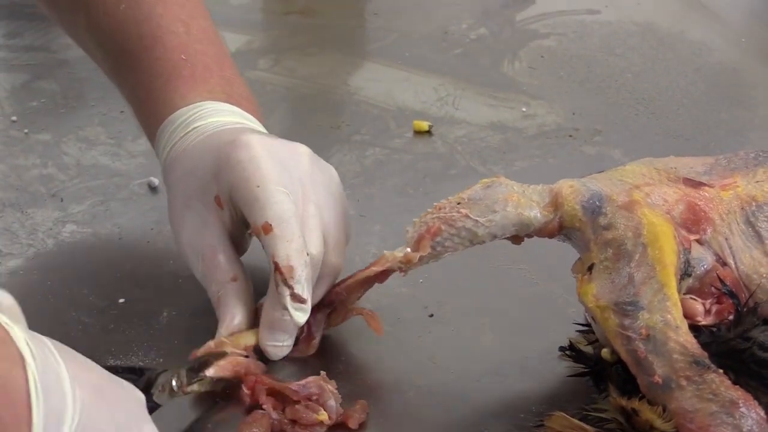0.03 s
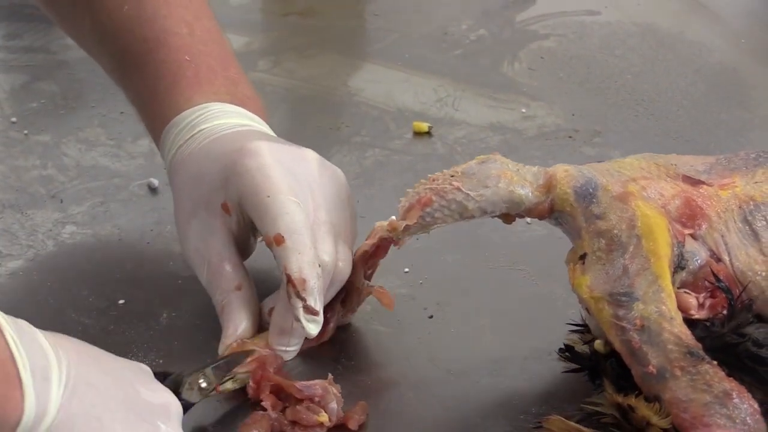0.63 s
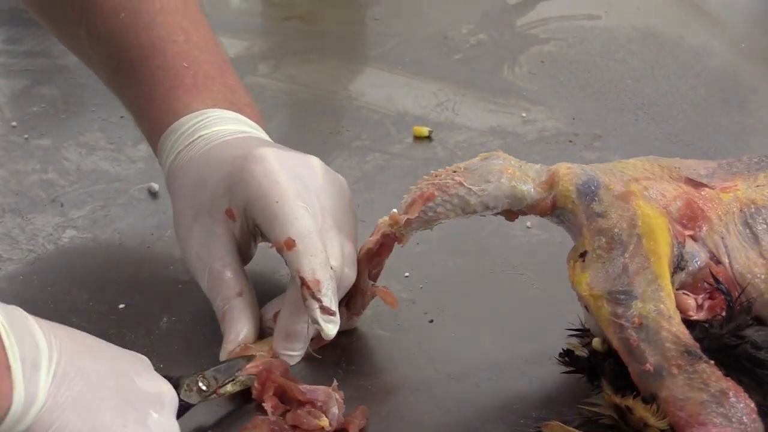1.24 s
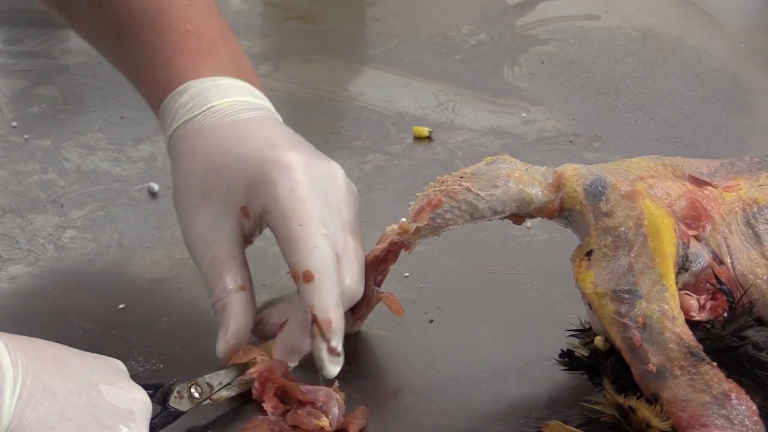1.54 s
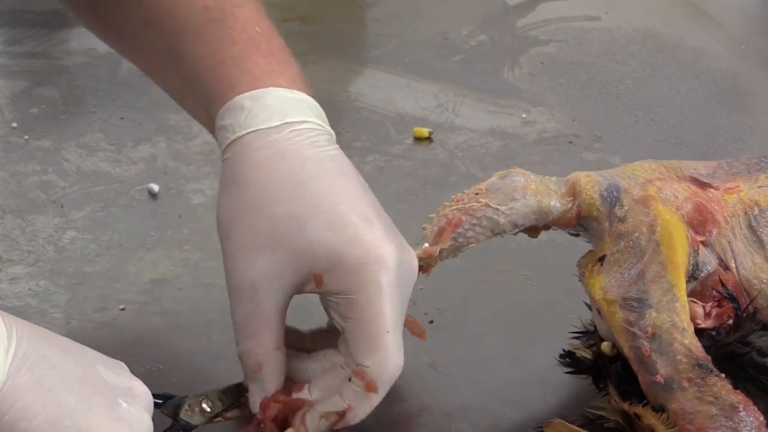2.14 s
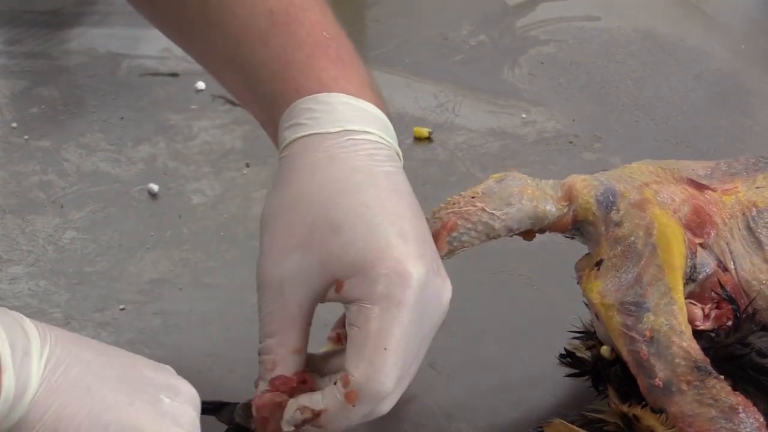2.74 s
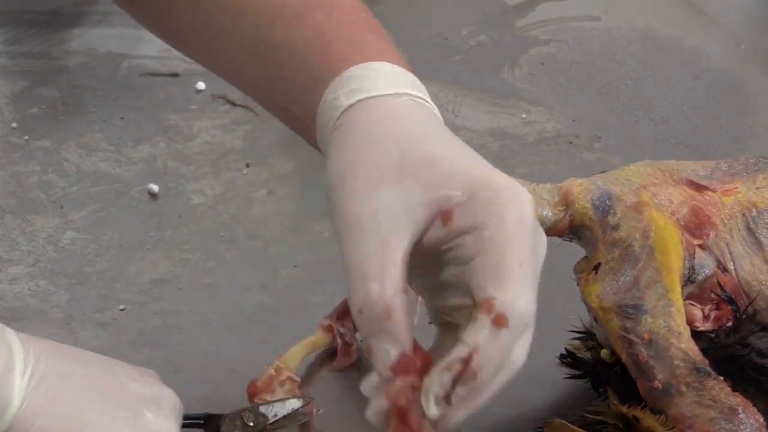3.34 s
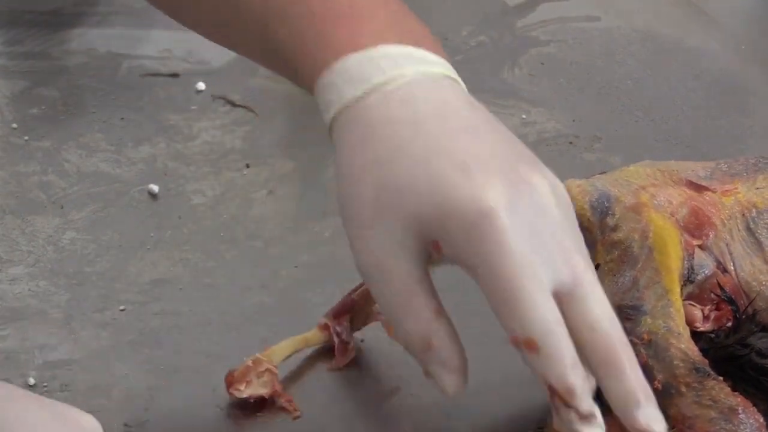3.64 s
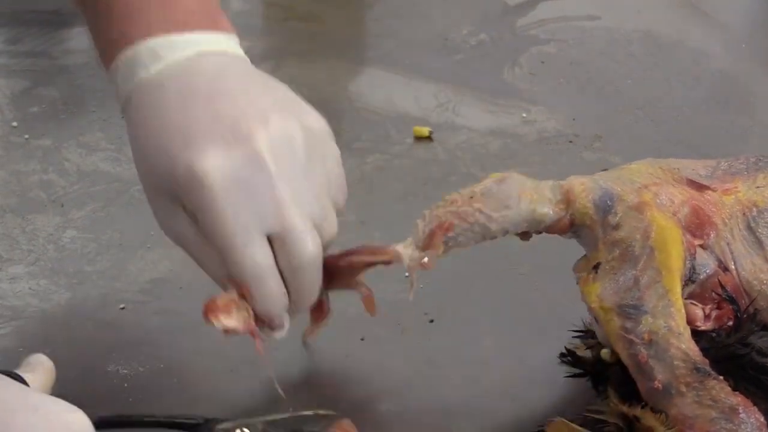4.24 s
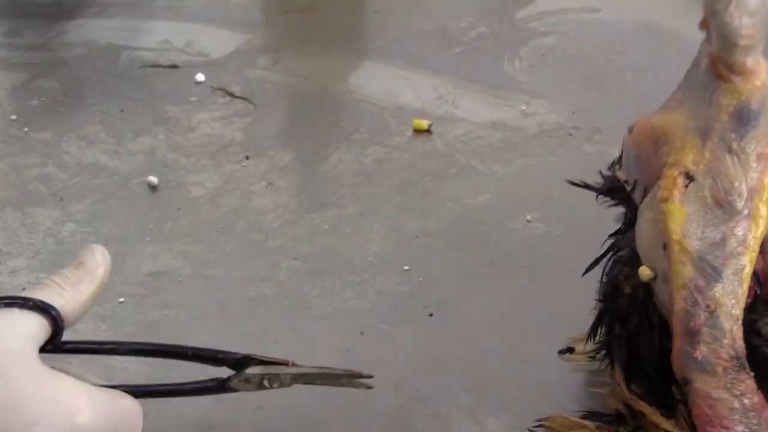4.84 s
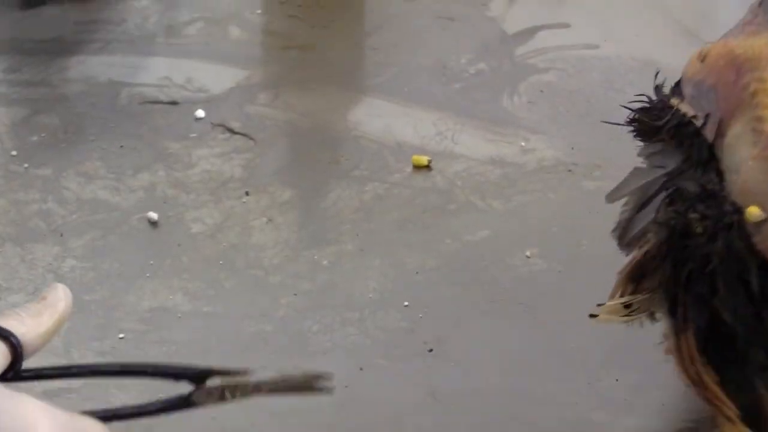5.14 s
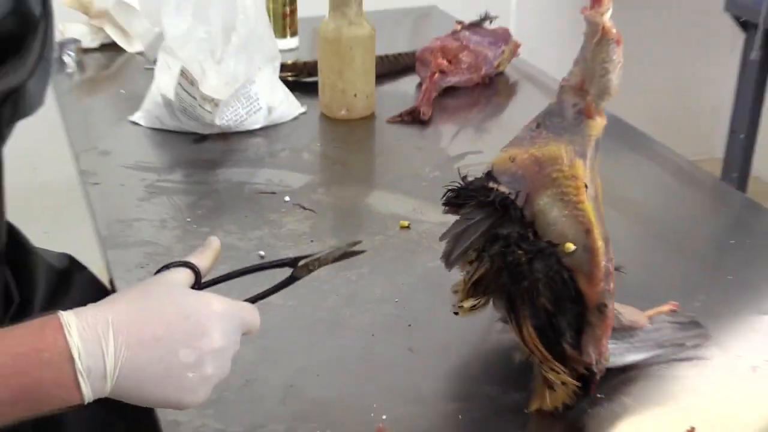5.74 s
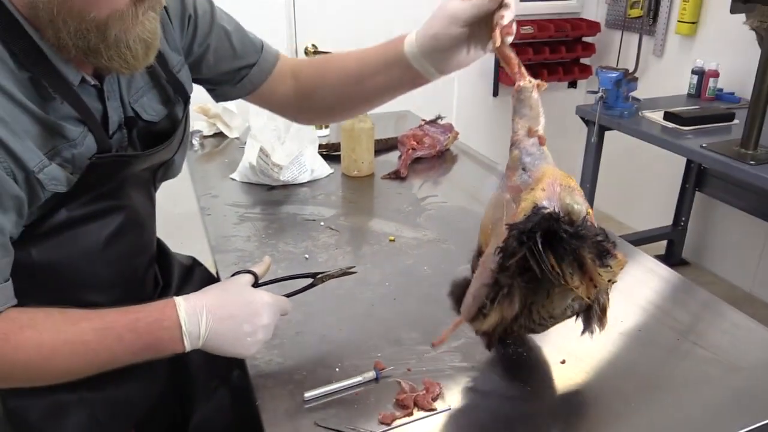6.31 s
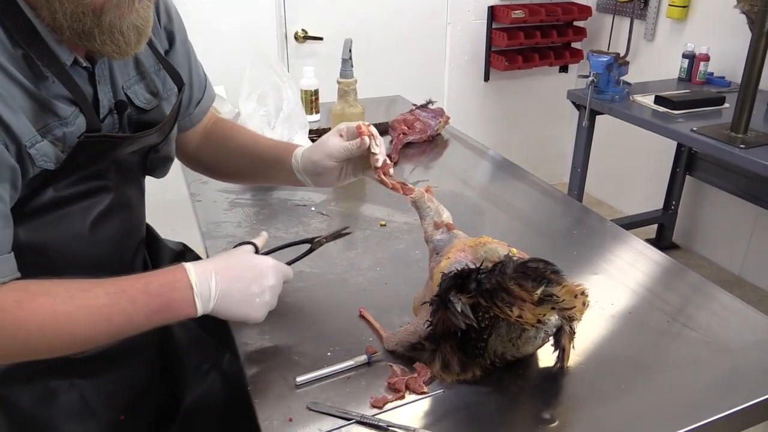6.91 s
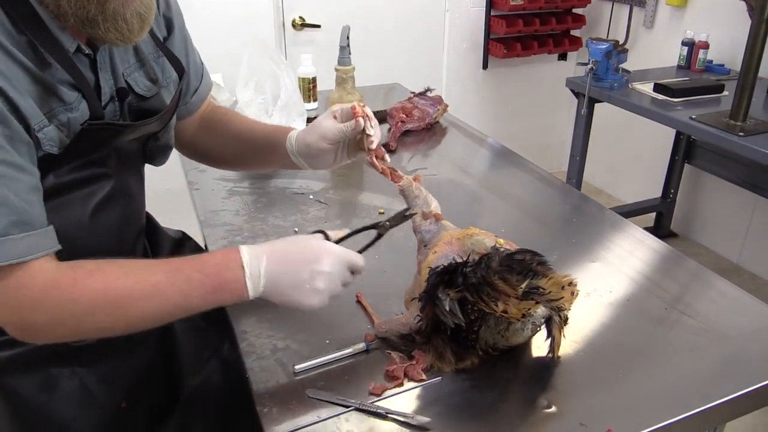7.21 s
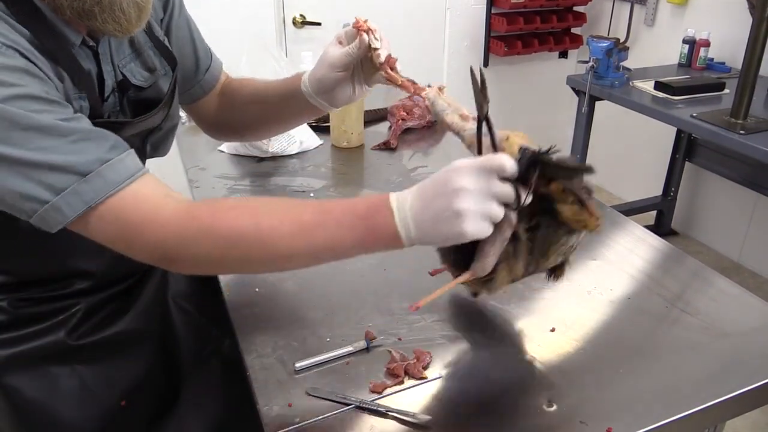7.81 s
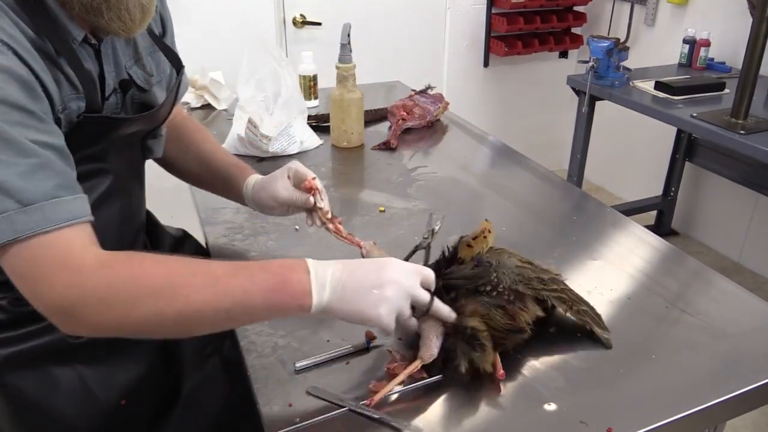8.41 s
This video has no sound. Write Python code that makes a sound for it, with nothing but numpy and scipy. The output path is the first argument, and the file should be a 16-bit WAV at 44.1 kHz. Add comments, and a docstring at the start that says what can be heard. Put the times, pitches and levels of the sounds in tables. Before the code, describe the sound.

Light taps on a steel tabletop mix with close, irregular scissor snips through a bird's wing. The blades rub faintly, tick and snap shut, making the table ring. After the sharpest snip comes a quieter stretch, then the carcass lands with a loud, hollow metallic knock. Feathers and gloves rustle, and two more knocks follow near the end. A faint rumble and hiss fills the slightly echoing workroom.

```python
"""A hard-walled workroom with a steel table. Scissors snip meat and tendon from a bird's wing.
Each cut ends in a click of the blades and a boom of the table top; between cuts the blades rub
and the hands nudge the table. Then the carcass is lifted, its feathers rustle, and it is knocked
down on the steel a few times. The room rumbles and hisses faintly throughout."""
import sys
import numpy as np
from scipy import signal
from scipy.fft import rfft, irfft, next_fast_len
from scipy.io import wavfile

SR = 44100
rng = np.random.default_rng(int(sys.argv[2]) if len(sys.argv) > 2 else 0)


def output_pcm(signal):
    """Save a mono or channel-first signal as 16-bit PCM at the path in sys.argv[1].

    Samples are clipped to [-1, 1] before scaling.
    """
    pcm = np.clip(np.atleast_2d(signal).T, -1, 1) * 32767
    wavfile.write(sys.argv[1], SR, np.round(pcm).astype(np.int16))


N = 373086
AGE_S = np.arange(SR) / SR   # time since a blow
BINS_HZ = np.arange(SR // 2 + 1) + 1e-3   # spectrum bins of that second

# Spectra of room air, rustle, carcass contact and blade contact.
# Each row: frequency in Hz, relative level in dB.
AIR_SPECTRUM = [(12, -20), (20, 3), (59, -3), (113, -6.5), (233, -17), (345, -16.5), (510, -23), (693, -17),
                (1050, -29), (1950, -32), (3400, -33.5), (5170, -32.5), (6120, -33.5), (14500, -34.5),
                (15800, -34.5)]
RUSTLE_SPECTRUM = [(88, 2), (150, -5.5), (312, -7), (380, -3.5), (649, -6), (1130, -11.5), (1500, -19),
                   (2800, -20.5), (4500, -26), (15000, -32)]
CARCASS_SPECTRUM = [(60, -19), (130, -3), (230, -1.5), (340, -1.5), (560, -0.5), (800, -8.5), (980, -10.5),
                    (1500, -22), (2400, -23), (3500, -25.5), (4500, -32), (7500, -38), (10000, -34),
                    (15500, -46)]
BLADE_SPECTRUM = [(60, -14), (160, -28.5), (250, -5.5), (370, -5.5), (480, -0.5), (720, -4), (1020, -22),
                  (1300, -18.5), (1950, -19), (2400, -23), (3500, -27.5), (4250, -25.5), (10500, -38),
                  (15500, -43)]

# Six ring-out bands: five crossovers and six centres, in Hz.
CROSSOVERS_HZ = [330, 850, 2000, 4200, 8500]
CENTRES_HZ = [200, 530, 1300, 2900, 6000, 11000]
# Decay of sheet and room by band. Each row: t60 in seconds, first-ring weight, build-up in seconds.
BAND_DECAYS = [(0.57, 1.3, 0.00057), (0.68, 3.1, 0.0042), (0.75, 0.24, 0.00036), (0.71, 0.032, 0.0071),
               (0.72, 0.067, 0.027), (0.51, 0.26, 0.0059)]
# Ring-out of each kind of contact. Each entry: relative band level in dB.
NUDGE_BANDS_DB = [-17, -20.5, -32, -49, -51, -53]
KNOCK_BANDS_DB = [-11.5, -1, -6, -16, -20.5, -23]
SNIP_BANDS_DB = [-13.5, 0.5, -9, -14.5, -22.5, -16.5]

# Table top modes. Each row: frequency in Hz, relative level in dB, t60 in seconds.
SHEET_MODES = [(127.7, -4, 0.62), (185.6, -6.5, 0.71), (219.6, -1, 0.32), (257.4, -9, 0.62),
               (277, -2, 0.36), (327, -42, 0.26), (457, -9.5, 0.94), (490.3, -6.5, 0.57), (510, -29, 0.54),
               (587, -39, 0.25), (616, -21, 0.38), (640, -11, 0.55), (943, -11.5, 0.79), (1094, -27, 0.38)]
# Broad scissor resonances. Each row: centre in Hz, width in Hz, boost in dB.
BLADE_RESONANCES = [(3360, 880, 7.5), (5120, 1100, 11.5), (6950, 1400, 11.5), (8050, 1000, 2),
                    (9770, 2500, 8.5), (13700, 1200, 5)]
# Clear blade tones. Each row: frequency in Hz, relative level in dB.
BLADE_PARTIALS = [(2007, -8), (2563, -5), (3327, -5), (3618, -3), (5146, -6), (6621, -6), (7219, -4),
                  (7795, -3), (8210, 9), (9369, 6), (9399, -4), (9655, -18), (9911, -11), (10080, -5)]

# Feathers and gloves brush past. Each row: centre in seconds, width in seconds, level in dB.
BRUSHES = [(0.1, 0.62, -74.5), (2.25, 0.31, -70), (3.52, 0.55, -72), (5.04, 0.34, -69), (5.553, 0.23, -68),
           (6.4, 2.2, -68.5), (7.47, 0.19, -66), (7.737, 0.28, -58), (8.407, 0.4, -56.5)]
# Dull thuds as things are moved. Each row: start in seconds, level in dB, pitch in Hz.
PUSHES = [(2.897, -46, 95), (7.574, -47.5, 61), (7.62, -54, 105), (7.828, -46, 164)]
# Hands and scissors nudge the table. Each row: start in seconds, level in dB, boom in Hz,
# bass share in dB, settling time in seconds.
TOUCHES = [(0.109, -55.5, 420, -2.5, 0.014), (0.163, -45.5, 393, -8.5, 0.0081),
           (0.294, -53, 587, -20, 0.0045), (0.368, -42, 595, -12, 0.008), (0.501, -42.5, 516, -13.5, 0.024),
           (0.611, -49.5, 681, -15, 0.0045), (0.67, -49.5, 380, -6.5, 0.026),
           (0.827, -52, 560, -3.5, 0.0037), (1.105, -54, 580, -10, 0.008), (1.22, -50, 595, -19, 0.005),
           (1.256, -36, 587, -13.5, 0.17), (1.349, -30, 420, -27, 0.0059), (2.536, -49, 480, -5.5, 0.016),
           (2.599, -47, 496, -20, 0.0066), (2.882, -35, 530, -15, 0.031), (4.045, -46.5, 446, -4, 0.0051),
           (4.672, -52.5, 494, -10, 0.024)]
# Blades slide on each other and through gristle. Each row: start in seconds, length in seconds,
# level in dB, squeak in Hz, relative level of its octave in dB.
BLADE_RUBS = [(0.489, 0.02, -67.5, 6600, -15), (1.21, 0.015, -75, 5800, -15), (2.136, 0.28, -81, 5150, -12),
              (2.577, 0.046, -75, 6130, 2), (2.853, 0.044, -64, 5900, -2), (2.884, 0.029, -64, 1910, -15),
              (4.554, 0.088, -79, 5800, -9)]
# Pivot ticks. Each row: start in seconds, level in dB, resonance in Hz.
PIVOT_TICKS = [(0.352, -57, 4600), (1.8462, -55.5, 9850), (2.1306, -48.5, 6540), (2.2957, -58, 13300),
               (2.6135, -53, 12200), (2.9004, -46.5, 11700), (3.1373, -55, 12200), (4.657, -48, 13200)]
# Carcass and bone land. Each row: start in seconds, boom in dB, boom in Hz, top of the clack in Hz,
# click in dB, ring-out in dB, treble tilt in dB per octave, clack boost in dB.
LANDINGS = [(5.3431, -48, 507, 4020, -63.5, -62.5, 1, 9.5), (6.313, -36, 480, 3900, -58, -52, -3.5, 9.5),
            (6.4467, -18, 582, 3860, -48.5, -36, 0, -2.5), (8.0821, -26, 602, 2800, -56, -39, -1.5, -4),
            (8.236, -22.5, 567, 3860, -49, -41.5, -0.3, 7.5)]
# Blades snap through. Each row: start in seconds, boom in dB, boom in Hz, blade ring in Hz,
# shank ring in Hz, click in dB, ring-out in dB, treble tilt in dB per octave.
CUTS = [(0.5306, -45, 590, 6600, 1320, -59.5, -57.5, -4.5), (1.336, -30, 569, 6950, 1220, -43.5, -46, -1.7),
        (3.1778, -30, 465, 12200, 3230, -47, -46, 2.5), (4.0966, -17.5, 496, 9730, 2060, -45.5, -37.5, 1.0)]


def from_db(db):
    """Decibels to gain."""
    return 10 ** (np.asarray(db) / 20)


def rms_one(x):
    """Scale to rms 1."""
    return x / np.sqrt(np.mean(x ** 2) + 1e-30)


def gain_at(spectrum, hz):
    """Gain of a (Hz, dB) spectrum."""
    knots_hz, db = np.transpose(spectrum)
    return from_db(np.interp(np.log(hz + 1e-3), np.log(knots_hz), db))


def hump(centre_hz, width_hz):
    """One resonance over BINS_HZ, peak 1."""
    return 1 / (1 + (2 * (BINS_HZ - centre_hz) / width_hz) ** 2)


def fade(t60_s):
    """Exponential decay."""
    return np.exp(-np.log(1000) * AGE_S / t60_s)


def sine(hz):
    """One second of sine."""
    return np.sin(2 * np.pi * hz * AGE_S)


def noise(colour):
    """One second of noise with the given bin gains, rms 1."""
    return rms_one(irfft(colour * np.exp(2j * np.pi * rng.random(len(colour))), SR))


def coloured(track, spectrum):
    """Filter a whole track by a spectrum; rms 1."""
    size = next_fast_len(N)
    hz = np.arange(size // 2 + 1) * SR / size
    return rms_one(irfft(rfft(track, size) * gain_at(spectrum, hz), size)[:N])


def add(track, start_s, sound):
    """Mix a sound into a track."""
    at = max(round(start_s * SR), 0)
    track[at:at + len(sound)] += sound[:N - at]


def in_room(x, wet_db, t60_s=0.43):
    """Add the workroom's reverberation."""
    tail = rms_one(rng.standard_normal(SR) * fade(t60_s)) / np.sqrt(SR)
    return x + from_db(wet_db) * signal.fftconvolve(x, tail)[:N]


def room_air(level_db=-66):
    """Steady rumble and hiss."""
    return from_db(level_db) * coloured(rng.standard_normal(N), AIR_SPECTRUM)


def rustle(grains_per_s=6000, floor_db=-85, trim_db=-4):
    """Tiny slips of feathers and gloves swell with each move; the hands are never quite still."""
    time_s = np.arange(N) / SR
    swells = [from_db(db) * np.exp(-2 * ((time_s - centre_s) / width_s) ** 2)
              for centre_s, width_s, db in BRUSHES]
    motion = np.sqrt(from_db(floor_db) ** 2 + sum(swell ** 2 for swell in swells))
    grains = (rng.random(N) < grains_per_s / SR) * rng.standard_normal(N)
    return in_room(coloured(grains, RUSTLE_SPECTRUM) * motion * from_db(trim_db), wet_db=2.5)


def thuds(rise_cycles=0.33):
    """Slow, soft pushes: a few cycles of bass."""
    out = np.zeros(N)
    for start_s, db, hz in PUSHES:
        rise = AGE_S * hz / rise_cycles
        add(out, start_s, from_db(db) * sine(hz) * rise * np.exp(1 - rise))
    return out


def boom(hz, bass_gain, rise_s=0.002, bass_hz=285):
    """The sheet is pushed down and swings a few cycles before the wave spreads away."""
    swing = (AGE_S / rise_s * np.exp(1 - AGE_S / rise_s)) ** 1.27
    return -swing * (sine(hz) + bass_gain * sine(bass_hz)) / (1 + bass_gain / 2)


def ring_out(bands_db, colour, first_t60_s=0.098):
    """Dense modes of sheet and room in six overlapping bands: a short first ring, then the tail."""
    lowpasses = [0] + [1 / (1 + (BINS_HZ / hz) ** 10) for hz in CROSSOVERS_HZ] + [1]
    masks = np.sqrt(np.abs([high - low for low, high in zip(lowpasses, lowpasses[1:])]))
    early = slice(SR // 200, SR // 12)
    bands = []
    for mask, (t60_s, first_weight, build_s) in zip(masks, BAND_DECAYS):
        decay = fade(t60_s) + first_weight * fade(first_t60_s)
        band = noise(colour * mask) * decay * (1 - np.exp(-AGE_S / build_s))
        bands.append(band / np.std(band[early]))
    return from_db(bands_db) @ np.array(bands)


def nudges(boom_db=-8.5, bass_lift_db=8, damping_t60_s=4.9, repeats=3, gap_s=0.015, jitter_s=0.00183):
    """Soft touches boom the sheet and settle in a run of weaker ones; the hand shortens the ring."""
    out = np.zeros(N)
    for start_s, db, hz, bass_db, settle_s in TOUCHES:
        bands_db = np.array(NUDGE_BANDS_DB, float)
        bands_db[0] += bass_db + bass_lift_db
        colour = gain_at(CARCASS_SPECTRUM, BINS_HZ) * (1 + hump(hz, 300))
        thump = from_db(boom_db) * boom(hz, from_db(bass_db))
        delays_s = gap_s * np.arange(1, repeats + 1) + jitter_s * rng.standard_normal(repeats)
        for delay_s in [0, *delays_s]:
            force = from_db(db) * np.exp(-delay_s / settle_s)
            tail = ring_out(bands_db, colour) * fade(damping_t60_s)
            add(out, start_s + delay_s, force * (thump + tail))
    return out


def blade_gain():
    """Broad resonances of the steel blades."""
    return from_db(sum(db * hump(hz, width_hz) for hz, width_hz, db in BLADE_RESONANCES))


def rubs_and_ticks(slips_per_s=450, squeak_width_hz=520, tick_trim_db=-8, tick_t60_s=0.012):
    """Fine stick-slip of the sliding blades and ticks of the pivot."""
    out = np.zeros(N)
    steel = blade_gain() * (1 - hump(0, 6000))
    for start_s, length_s, db, hz, octave_db in BLADE_RUBS:
        slips = (rng.random(SR) < slips_per_s / SR) * rng.standard_normal(SR)
        squeak = hump(hz, squeak_width_hz) + from_db(octave_db) * hump(2 * hz, squeak_width_hz)
        grit = rms_one(irfft(rfft(slips) * (0.15 * steel + squeak), SR))
        stroke = np.sqrt(np.abs(np.sin(np.pi * np.minimum(AGE_S / length_s, 1))))
        add(out, start_s, from_db(db) * grit * stroke)
    for start_s, db, hz in PIVOT_TICKS:
        tick = noise(steel * (0.37 + hump(hz, 1500))) * fade(tick_t60_s)
        add(out, start_s, from_db(db + tick_trim_db) * tick)
    return in_room(out, wet_db=-2.5)


def ring_levels_db(shape_db, ring_db, tilt_db_per_oct, clack_db=0,
                   tilt_from_hz=1460, clack_hz=3430, clack_width_oct=1.47):
    """Band levels of a blow: harder contact tilts the treble up, bone adds a clack."""
    hz = np.array(CENTRES_HZ)
    tilt_db = tilt_db_per_oct * np.maximum(np.log2(hz / tilt_from_hz), 0)
    bone_db = clack_db * np.exp(-(np.log2(hz / clack_hz) / clack_width_oct) ** 2)
    return ring_db + np.array(shape_db) + tilt_db + bone_db


def mode_ripple(knots=320, depth_db=2.5):
    """Random bin gains: modes crowd at some pitches and thin out at others."""
    knots_hz = np.geomspace(600, SR / 2, knots)
    return from_db(depth_db * np.interp(BINS_HZ, knots_hz, rng.standard_normal(knots)))


def sheet_tones(bands_db, colour, spread_db=4.5):
    """The clearest table modes; each spot on the sheet excites them differently."""
    hz, db, t60_s = np.transpose(SHEET_MODES)
    force_db = np.interp(np.log(hz), np.log(CENTRES_HZ), bands_db - 20 * np.log10(colour[CENTRES_HZ]))
    spot_db = spread_db * rng.standard_normal(len(hz))
    gains = from_db(db + force_db + spot_db) * np.interp(hz, BINS_HZ, colour)
    gains *= rng.choice([-1, 1], len(hz))
    return gains @ (sine(hz[:, None]) * fade(t60_s[:, None]))


def blow(boom_db, boom_hz, click_db, bands_db, colour, click_t60_s, modes_db,
         bass_db=-3.5, click_low_hz=2400, click_top_hz=12000):
    """Hard contact: a click, the boom of the sheet, the ring-out and the sheet's modes."""
    click_band = (1 - hump(0, 2 * click_low_hz)) / (1 + (BINS_HZ / click_top_hz) ** 4)
    click = from_db(click_db) * noise(colour * click_band) * fade(click_t60_s)
    thump = from_db(boom_db) * boom(boom_hz, from_db(bands_db[0] - bands_db[1] + bass_db))
    tail = ring_out(bands_db, colour * mode_ripple() * (1 + hump(boom_hz, 310)))
    return click + thump + tail + from_db(modes_db) * sheet_tones(bands_db, colour)


def knocks(slap_db=5, shelf_db=-8):
    """Flesh and bone strike the sheet; each knock's clack dulls above its own cutoff."""
    out = np.zeros(N)
    for start_s, boom_db, boom_hz, top_hz, click_db, ring_db, tilt_db_per_oct, clack_db in LANDINGS:
        bands_db = ring_levels_db(KNOCK_BANDS_DB, ring_db, tilt_db_per_oct, clack_db)
        above_clack = 1 - 1 / (1 + (BINS_HZ / top_hz) ** 20)
        colour = gain_at(CARCASS_SPECTRUM, BINS_HZ) * from_db(shelf_db * above_clack)
        knock = blow(boom_db, boom_hz, click_db + slap_db, bands_db, colour,
                     click_t60_s=0.043, modes_db=-1.5)
        add(out, start_s, knock)
    return out


def blade_tones(bands_db, contact, trim_db=-13, t60_s=0.65, spread_db=2):
    """The blades sing on after snapping shut."""
    hz, db = np.transpose(BLADE_PARTIALS)
    force_db = np.interp(np.log(hz), np.log(CENTRES_HZ), bands_db)
    scatter_db = spread_db * rng.standard_normal(len(hz))
    gains = from_db(db + trim_db + force_db + scatter_db) * np.interp(hz, BINS_HZ, contact)
    gains *= rng.choice([-1, 1], len(hz))
    return gains @ sine(hz[:, None]) * fade(t60_s)


def snips(snap_db=3, boost_db=5, blade_width_hz=1400, shank_width_hz=450, ping_db=-0.5):
    """The blades break through; where they meet decides which resonances ring most."""
    out = np.zeros(N)
    steel = gain_at(BLADE_SPECTRUM, BINS_HZ) * blade_gain()
    for start_s, boom_db, boom_hz, blade_hz, shank_hz, click_db, ring_db, tilt_db_per_oct in CUTS:
        bands_db = ring_levels_db(SNIP_BANDS_DB, ring_db, tilt_db_per_oct)
        contact = from_db(boost_db * (hump(blade_hz, blade_width_hz) + hump(shank_hz, shank_width_hz)))
        ping = from_db(click_db + ping_db) * sine(blade_hz) * fade(t60_s=0.015)
        snap = blow(boom_db, boom_hz, click_db + snap_db, bands_db, steel * contact,
                    click_t60_s=0.018, modes_db=2)
        add(out, start_s, snap + ping + blade_tones(bands_db, contact))
    return out


def scene():
    """Cuts, knocks and handling over room air; mono."""
    return (room_air() + snips() + knocks() + nudges() + thuds() + rubs_and_ticks() + rustle())[None]


def record(dry):
    """Steep elliptic low-pass."""
    cutoff_hz = 15750
    return signal.sosfilt(signal.ellip(12, .1, 70, cutoff_hz, fs=SR, output="sos"), dry)


dry = scene()
out = record(dry)
output_pcm(out)
```